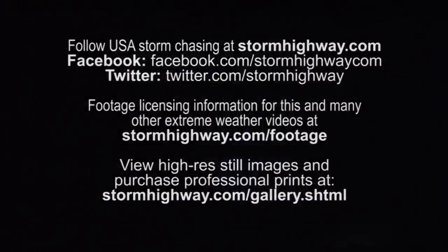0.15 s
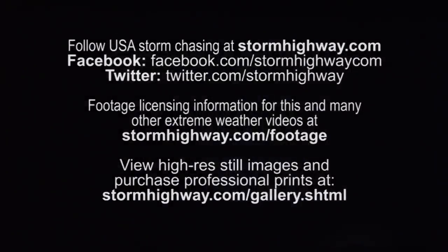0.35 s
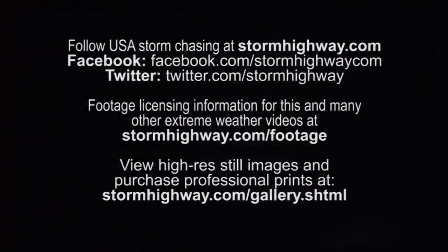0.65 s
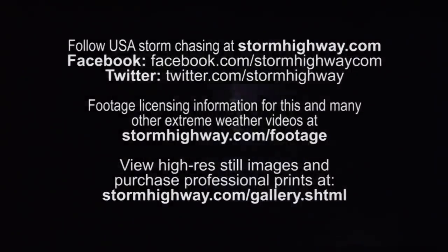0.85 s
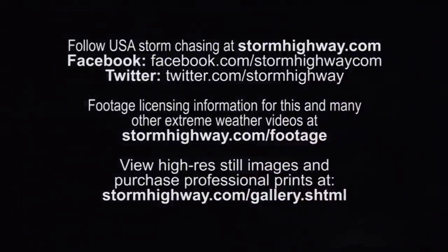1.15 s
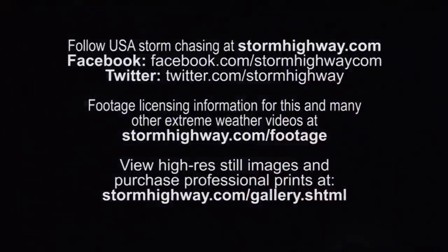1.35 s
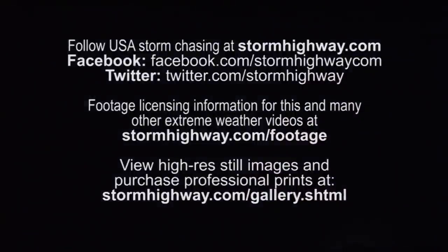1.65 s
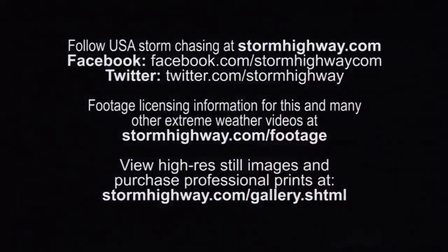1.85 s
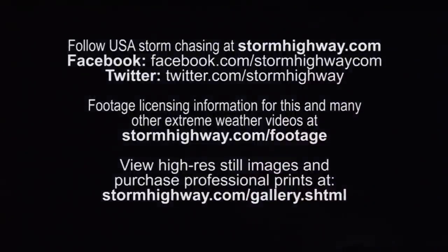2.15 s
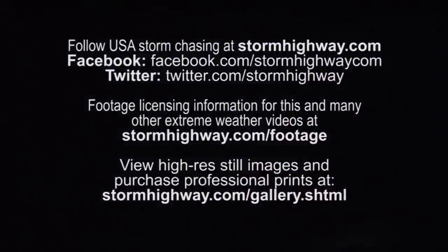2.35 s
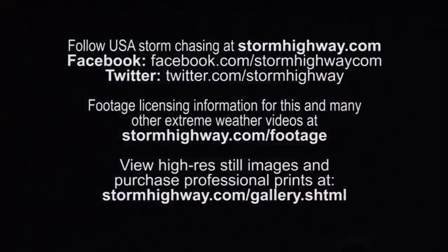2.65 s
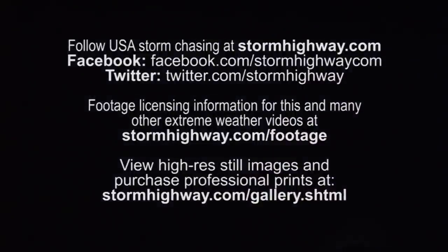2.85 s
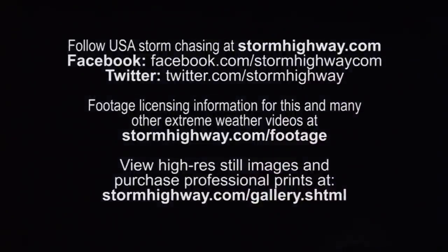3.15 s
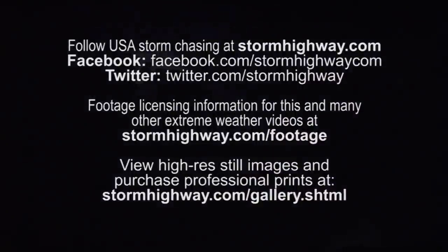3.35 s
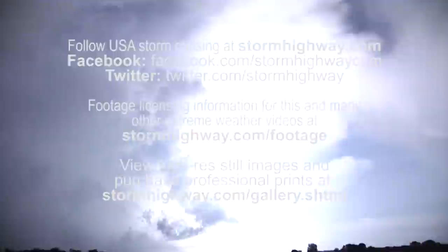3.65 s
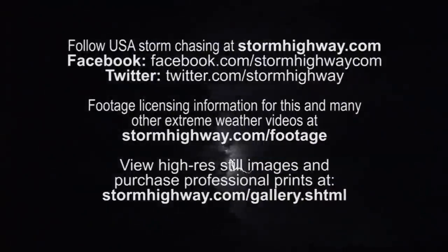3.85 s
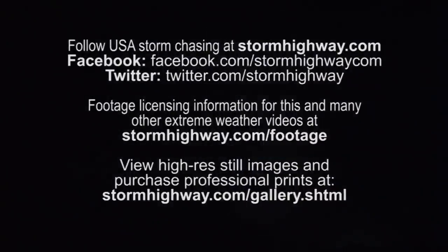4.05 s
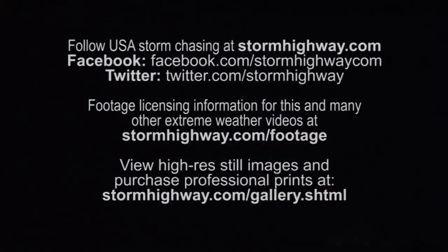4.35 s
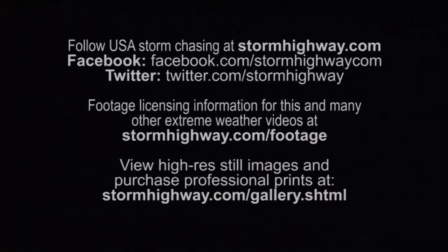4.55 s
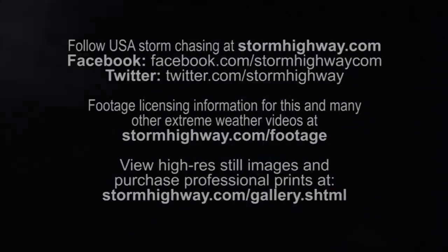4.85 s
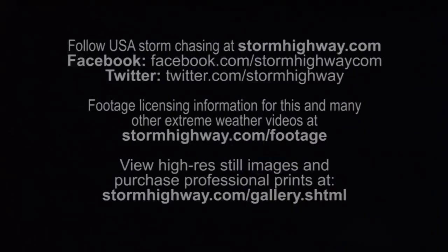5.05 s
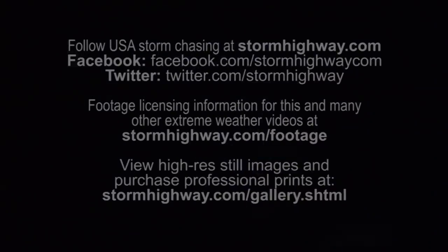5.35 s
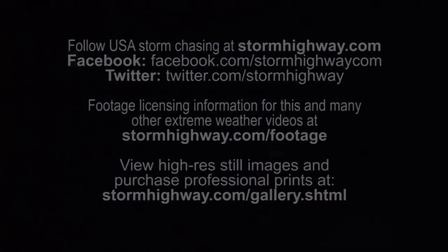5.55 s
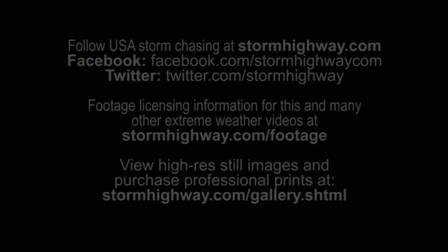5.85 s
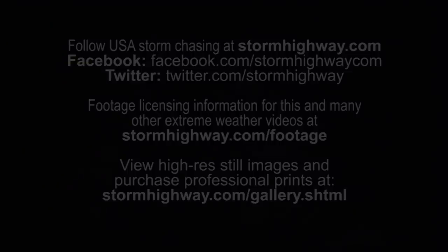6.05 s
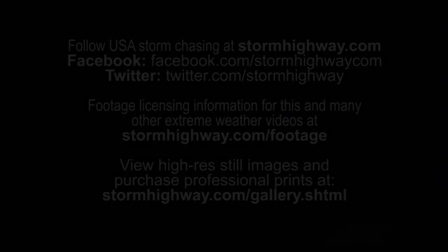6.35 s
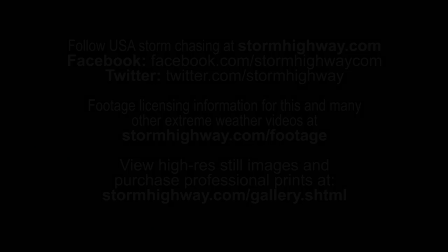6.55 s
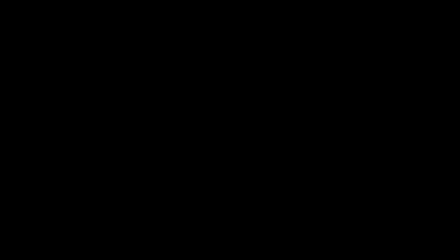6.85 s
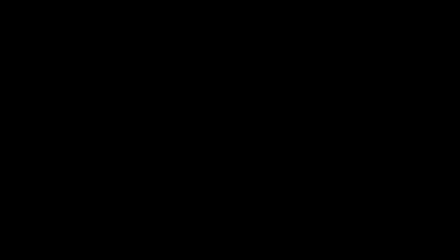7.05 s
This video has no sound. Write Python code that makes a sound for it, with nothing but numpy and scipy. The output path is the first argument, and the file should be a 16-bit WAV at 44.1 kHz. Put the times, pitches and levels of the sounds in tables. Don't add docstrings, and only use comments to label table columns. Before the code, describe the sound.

Stereo night ambience in the open: distant thunder rumbles low and lumpy while many crickets trill all around. A field cricket left of center gives brief bright chirps and a tree cricket pulses about four times a second. As storm and chorus die away, a gritty scrape and one hard plastic click sound right at the microphones. Crickets, faint trill and fizzing katydids remain, then fade out after a soft wind thump.

```python
import sys
import numpy as np
from scipy import signal
from scipy.fft import rfft, irfft, next_fast_len
from scipy.io import wavfile
from scipy.ndimage import uniform_filter1d, map_coordinates

SR = 44100
rng = np.random.default_rng(int(sys.argv[2]) if len(sys.argv) > 2 else 0)


def voltage_ratio(level):
    return 10 ** (np.asarray(level, float) / 20)


def wav_out(sig):
    wavfile.write(sys.argv[1], SR, np.round(np.clip(np.atleast_2d(sig).T, -1, 1) * 32767).astype(np.int16))


N = 317079

STORM_FADE_S = (0, 3.242)


def unit(x):
    return x / np.sqrt(np.mean(x ** 2) + 1e-20)


def along(points, hz):
    f, v = np.transpose(points)
    return np.interp(np.log(hz + 1), np.log(f + 1), v)


def curves(rows):
    s, *columns_db = np.transpose(rows)
    t = np.arange(N) / SR
    return [voltage_ratio(np.interp(t, s, db, left=-150, right=-150)) for db in columns_db]


def fade(span_s):
    return np.interp(np.arange(N) / SR, span_s, [1, 0])


def wobble(rate_hz):
    knots = rng.standard_normal(int(N * rate_hz / SR) + 4)
    return map_coordinates(knots, [np.arange(N) * rate_hz / SR])


def filtered(x, response):
    m = next_fast_len(N + SR // 2)
    return irfft(rfft(x, m) * response(np.fft.rfftfreq(m, 1 / SR)), m)[..., :N]


def rush(gain, alike, patchy_db):
    z = signal.stft(rng.standard_normal((2, N)), nperseg=512)[2]
    patches = uniform_filter1d(rng.standard_normal(z.shape[1:]), size=5, axis=0)
    patches = uniform_filter1d(patches, size=8, axis=1)
    pair = signal.istft(z * voltage_ratio(patchy_db * unit(patches)), nperseg=512)[1][:, :N]

    def mid_side(hz):
        turn = np.arccos(np.clip(along(alike, hz), -1, 1)) / 2
        return gain(hz) * [np.cos(turn), np.sin(turn)]

    mid, side = filtered(pair, mid_side)
    return unit(np.array([mid + side, mid - side]))


def strokes(s, db, hz, pan_db, lead_rad, length_s, fall, bend):
    size = int(np.max(length_s) * SR) + 2
    u = np.clip(np.arange(size) / SR / length_s[:, None], 0, 1)
    pitch_hz = hz[:, None] * (1 + fall * (.5 ** bend - u ** bend))
    phase = 2 * np.pi * (np.cumsum(pitch_hz, axis=1) / SR + rng.random((len(s), 1)))
    swell = voltage_ratio(db[:, None] + 3) * np.sin(np.pi * u ** 1.15) ** 1.2
    first = np.round((s - length_s / 2) * SR).astype(int)
    at = np.clip(first[:, None] + np.arange(size), 0, N)
    ears = []
    for side in (1, -1):
        tone = np.sin(phase + side * lead_rad[:, None] / 2)
        ear = swell * voltage_ratio(side * pan_db[:, None] / 2) * tone
        ears.append(np.bincount(at.ravel(), ear.ravel(), N + 1)[:N])
    return np.array(ears)


def thunder():
    # time in seconds, strength in dB.
    peal_rows = [
        (0, -36.5),
        (.4, -38),
        (.81, -37),
        (1.33, -38),
        (1.43, -33.5),
        (1.5, -38.5),
        (1.96, -35),
        (2.74, -37.5),
        (3.3, -43),
    ]
    # frequency in Hz, level in dB per Hz.
    boom_spectrum = [(8.8, -31), (15, -14), (43, 2), (86, -1), (130, -2), (170, -32.5), (290, -120)]
    roll_spectrum = [(59, -29), (100, -9.5), (152, 2), (274, -6.5), (324, -4), (371, -7.5), (562, -13.5),
                     (767, -22), (1120, -41), (1200, -61), (1560, -72), (2640, -120)]
    roll_gain, = curves(peal_rows)
    boom_lead_s, boom_db, boom_growth = 0.11, -2, 0.61
    boom_gain, = curves([(max(s - boom_lead_s, 0), boom_db - 37 + boom_growth * (db + 37))
                         for s, db in peal_rows])
    peals = voltage_ratio(0.6 * wobble(14) + 0.22 * wobble(45))
    boom = rush(lambda hz: voltage_ratio(along(boom_spectrum, hz)), [(50, .96)], patchy_db=-0.04)
    roll = rush(lambda hz: voltage_ratio(along(roll_spectrum, hz)), [(300, 1.0), (800, 1.0)], patchy_db=1.0)
    return boom_gain * boom + roll_gain * unit(peals * roll)


def chorus():
    crowd_db = [-55.5, -66, -69.5]
    # strokes per second, level in dB, pitch in Hz.
    crowds = [
        [(35.7, 0, 2970), (36.4, -4, 2910), (35.1, -6, 3020), (50.5, -7, 3000), (72.3, -5, 2930),
         (71.5, -8, 3010)],
        [(47.5, 0, 3330), (45.2, -1.5, 3580), (49.1, -2.5, 3460)],
        [(21.5, 0, 4420), (23.6, -1.5, 4800), (19.7, -1.5, 4620), (25.3, -2.5, 4950)],
    ]
    # frequency in Hz, level in dB per Hz.
    haze = [(1200, -33), (1600, -2.5), (2400, -4.5), (3200, 2), (4200, 0.5), (5500, -2), (6500, -24.5)]
    gains = voltage_ratio(crowd_db)
    out = voltage_ratio(-8) * gains[0] * rush(lambda hz: voltage_ratio(along(haze, hz)), [(3000, 0.25)], patchy_db=-2.5)
    falls, pauses_db, spreads = (.055, .08, .09), (.5, 3, 2.5), (.75, .8, 1)
    for gain, crowd, fall, pause_db, spread in zip(gains, crowds, falls, pauses_db, spreads):
        song = 0
        for rate_hz, db, hz in crowd:
            s = np.arange(rng.random() / rate_hz, 3.2, 1 / rate_hz)
            d = rng.standard_normal((len(s), 3))
            effort_db = db + 1.8 * d[:, 1] + pause_db * wobble(7)[(s * SR).astype(int)]
            pan_db = 0 * s + rng.normal(0, 3.2)
            lead_rad = 0 * s + spread * rng.uniform(-1.9, 2.94)
            song = song + strokes(s + .002 * d[:, 0], effort_db, hz + 25 * d[:, 2], pan_db, lead_rad,
                                  .52 / rate_hz + 0 * s, fall, bend=1.9)
        out = out + gain * song / np.std(song[:, :3 * SR])
    return out


def hedges(x):
    # frequency in Hz, 60 dB decay time in seconds.
    decay = [(1000, 0.23), (5000, 0.18), (14000, 0.16)]
    out, step = np.zeros((2, N + SR)), SR // 4
    for start in range(0, N, step):
        hz, t, z = signal.stft(rng.standard_normal((2, step)), SR, nperseg=256)
        dying = voltage_ratio(-60 * t / along(decay, hz)[:, None])
        tail = signal.istft(z * dying, SR, nperseg=256)[1]
        wet = signal.fftconvolve(x[:, start:start + step], tail / np.linalg.norm(tail[0]), axes=1)
        out[:, start:start + wet.shape[1]] += wet
    return out[:, :N]


def night_air():
    # time in seconds, buffet level in dB.
    wind_rows = [
        (0, -64),
        (2.87, -58.5),
        (4.1, -63),
        (4.19, -57.5),
        (5.5, -64.5),
        (5.74, -51),
        (5.8, -53),
        (5.92, -46.5),
        (6.06, -56),
        (7.1, -58.5),
    ]
    # frequency in Hz, level in dB per Hz.
    buffet_spectrum = [(7.1, -37.5), (12, -14.5), (44, 2), (91, -0.5), (107, 0.5), (264, -26.5), (330, -22),
                       (430, -50.5), (730, -120)]
    hum_spectrum = [(120, -26.5), (200, 1), (482, -7), (568, -1.5), (798, -9.5), (898, -3), (1120, -10.5),
                    (1630, -8), (1810, -13.5), (2770, -14), (3300, -7.5), (4290, -40), (7260, -120)]
    insect_spectrum = [(1760, -46.5), (3000, -25), (3380, -20), (3860, -3.5), (3990, -8), (4250, -11.5),
                       (4560, -5.5), (4820, -2.5), (5660, -7), (6030, -2), (6930, -1), (8140, 2),
                       (9690, -9), (13900, -6), (15900, -24)]
    # center in Hz, width in Hz, level over the hum in dB.
    hum_bands = [(890, 87, 4.5), (1225, 170, 6.5), (1628, 26, 6), (2490, 110, 7.5)]
    # frequency in Hz, left-right likeness.
    likeness = [(60, .97), (300, .4), (1400, .6), (3900, .75), (4250, -.7), (4800, -.3), (5500, -.75),
                (6100, -.5), (7100, -.75), (8200, -.5), (9500, -.2), (10500, .4), (15000, .5)]
    ground_swell_s = (1, 2.5)

    def hum_gain(hz):
        bands_db = sum(db * np.exp(-((hz - c) / w) ** 2) for c, w, db in hum_bands)
        return voltage_ratio(along(hum_spectrum, hz) + bands_db)

    hum_level = np.hypot(voltage_ratio(-71), voltage_ratio(-68.5) * fade(STORM_FADE_S))
    hum = hum_level * rush(hum_gain, likeness, patchy_db=1.0)
    hiss = rush(lambda hz: voltage_ratio(along(insect_spectrum, hz)), likeness, patchy_db=1.5)
    insects = voltage_ratio(0.22 * wobble(20)) * hiss
    ground = voltage_ratio(-15) * (1 - fade(ground_swell_s)) * ground_cricket()
    buffet = rush(lambda hz: voltage_ratio(along(buffet_spectrum, hz)), [(60, 1.0), (250, 0.91)], patchy_db=-0.76)
    wind = curves(wind_rows)[0] * unit(voltage_ratio(.4 * wobble(19)) * buffet)
    return voltage_ratio([[3.7], [2.5]]) * hum + voltage_ratio([[4.6], [3.4]]) * voltage_ratio(-65.5) * (insects + ground) + wind


def buzz(rate_hz, jitter_s):
    s = np.cumsum(1 / (rate_hz + .5 * wobble(1.6)[::round(SR / rate_hz)]))
    s, db = np.r_[s, s + .0014], np.repeat([0, -6], len(s))
    d = rng.standard_normal((len(s), 3))
    return unit(strokes(s + jitter_s * d[:, 0], db + 1.6 * d[:, 1], 13300 + 250 * d[:, 2],
                        0 * s + .8, 0 * s + 0.31, 0.0018 + 0 * s, fall=.36, bend=1.3))


def katydids():
    # time in seconds, buzz level in dB.
    buzz_rows = [
        (0, -62),
        (.98, -58.5),
        (3.28, -61.5),
        (3.93, -64),
        (4.59, -61),
        (5.5, -63.5),
        (6.42, -60.5),
        (7.1, -64),
    ]
    # frequency in Hz, level in dB per Hz.
    wing = [(6000, -45), (9800, -22.5), (11000, -13.5), (12300, -14.5), (13200, -7), (13900, 3),
            (14600, -3), (15300, 1), (15750, -10.5)]
    near = buzz(186.2, jitter_s=.00006) + voltage_ratio(-7) * buzz(181.2, jitter_s=.00006)
    shaped = unit(filtered(near, lambda hz: voltage_ratio(.5 * along(wing, hz))))
    blur = rush(lambda hz: voltage_ratio(along(wing, hz)), [(13000, .4)], patchy_db=2.5)
    return curves(buzz_rows)[0] * unit(shaped + blur)


def tree_cricket(chirps, singer, hz):
    gap_s = .021
    s, opening = np.transpose([(first_s + k * gap_s, k == 0)
                               for first_s, many in chirps for k in range(round(many))])
    at_s, effort_db, pan_db = np.transpose(singer)
    d = rng.standard_normal((len(s), 2))
    db = np.interp(s, at_s, effort_db) - 5 * opening + 1.4 * d[:, 0]
    return strokes(s, db, hz - 30 * opening + 22 * d[:, 1], np.interp(s, at_s, pan_db), 0 * s,
                   .015 + 0 * s, fall=.11, bend=1.6)


def tree_crickets():
    # first stroke in seconds, number of strokes.
    staying_chirps = [(.153, 6), (.419, 6), (.695, 6), (.94, 7), (1.187, 6), (1.46, 5), (1.696, 5),
                      (1.946, 4), (2.157, 6), (2.389, 5), (2.622, 6), (2.866, 5), (3.094, 5), (3.341, 4),
                      (3.567, 5), (3.781, 5), (4.002, 5), (4.244, 5), (4.492, 5), (4.706, 5), (4.923, 6),
                      (5.171, 5), (5.466, 5), (5.692, 5), (5.926, 5), (6.159, 5), (6.409, 6), (6.659, 5),
                      (6.883, 6)]
    leaving_chirps = [(.054, 5), (.317, 5), (.541, 5), (.771, 5), (.995, 5), (1.221, 5), (1.469, 5)]
    # time in seconds, effort in dB, left-right in dB.
    staying_singer = [(0, -57, 1), (1.5, -56.5, 12), (1.66, -64.5, 9), (2.8, -60.5, 0), (4.05, -66, -1),
                      (4.3, -63.5, 2), (6, -61.5, 5), (7.1, -64, 0)]
    leaving_singer = [(0, -62.5, 2.2), (.6, -62, 2.4), (.8, -62, 2), (1.25, -57.5, 2), (1.55, -62, 2)]
    staying = tree_cricket(staying_chirps, staying_singer, hz=3479)
    return staying + tree_cricket(leaving_chirps, leaving_singer, hz=3544)


def field_crickets():
    # third stroke in seconds, stretch, opener level in dB.
    near_chirps = [(.623, 1.04, -12), (1.542, 1.0, -15), (2.2, 0.98, -18), (3.003, .98, -17),
                   (3.875, 1.02, -11.5), (4.482, 0.95, -22), (5.223, .99, -18), (6.661, 1.02, -18)]
    # seconds from the third stroke, level in dB, pitch in Hz.
    near_strokes = [(-.07, -47, 4840), (-.0395, -50, 4990), (0, -48, 5005), (.0455, -48.5, 5000)]
    # pitch in Hz, left lead in radians, left-right in dB, stroke gap in seconds.
    far_voices = [(4430, 2.1, -.5, .053), (4830, 2.2, -.5, .052), (4820, 2.5, -.5, .045),
                  (4820, .7, -4, .049)]
    # first stroke in seconds, number of strokes, level in dB.
    far_chirps = [
        [(.16, 1, -47), (.52, 1, -55), (.92, 2, -53), (1.333, 2, -50), (1.706, 2, -54), (2.112, 1, -58)],
        [(.205, 2, -53), (.722, 3, -53), (1.155, 1, -57), (1.258, 2, -53), (1.41, 1, -55), (1.898, 2, -58),
         (2.314, 1, -65), (2.498, 3, -54)],
        [(2.645, 2, -67), (2.863, 2, -64), (3.419, 2, -64), (3.966, 2, -70), (4.194, 1, -64), (4.582, 2, -70),
         (4.99, 3, -63), (5.446, 2, -67), (5.84, 3, -71), (6.431, 2, -70)],
        [(1.826, 1, -63), (3.133, 2, -66.5), (4.759, 2, -65.5), (5.369, 2, -67), (5.64, 1, -72),
         (6.074, 3, -67.5), (6.776, 1, -65)],
    ]
    rows = [(at_s + stretch * later_s, db + opener_db * (k == 0), hz, k == 0)
            for at_s, stretch, opener_db in near_chirps
            for k, (later_s, db, hz) in enumerate(near_strokes)]
    s, db, hz, opening = np.transpose(rows)
    near = strokes(s, db, hz, 4 + 4 * opening, .85 - .8 * opening, .028 - 0.008 * opening, fall=0.1, bend=2.8)
    rows = [(at_s + k * gap_s, db, hz, lead_rad, pan_db)
            for (hz, lead_rad, pan_db, gap_s), chirps in zip(far_voices, far_chirps)
            for at_s, many, db in chirps for k in range(round(many))]
    s, db, hz, lead_rad, pan_db = np.transpose(rows)
    d = rng.standard_normal((len(s), 2))
    far = strokes(s, db + 1.0 + 0.67 * d[:, 0], hz + 40 * d[:, 1], pan_db, lead_rad,
                  0.03 + 0 * s, fall=0.098, bend=2.1)
    return near, far


def ground_cricket():
    s = np.arange(0, N / SR, 1 / 47.0)
    d = rng.standard_normal((len(s), 3))
    return strokes(s + .002 * d[:, 0], 2.5 * d[:, 1], 3850 + 25 * d[:, 2], 0 * s, 0 * s,
                   .013 + 0 * s, fall=.04, bend=1.4)


def switch():
    # start in seconds, peak in dB, scrape length in seconds, brightness in dB, left-right in dB.
    contacts = [
        (3.222, -57.5, 0.093, 10.5, 6.5),
        (3.234, -57, .012, 1, 7.5),
        (3.241, -47.5, 0.02, -2.5, 16.5),
        (3.259, -42, 0.005, -14.5, -1.5),
        (3.283, -52.5, 0.0026, -7, 2),
        (3.287, -42.5, 0.0089, 8, 10),
        (3.307, -30.5, 0.0025, 1.5, 8.5),
        (3.3099, -43.5, .004, 5, 0),
        (3.318, -49, 0.005, -14, -13.5),
    ]
    # center in Hz, width in Hz, level in dB.
    resonances = [(2100, 570, 0.5), (3160, 340, -14), (5620, 150, -8.5), (7760, 480, -21),
                  (11060, 160, -14), (12800, 224, -22), (14000, 140, -21.5)]
    # start in seconds, peak in dB, bottom in Hz, top in Hz.
    bumps = [
        (3.235, -48, 500, 1500),
        (3.246, -39, 395, 1610),
        (3.2495, -47.5, 355, 1400),
        (3.251, -58, 300, 888),
        (3.589, -51.5, 150, 800),
        (3.77, -51.5, 150, 598),
        (3.816, -51.5, 300, 2000),
        (5.4224, -49, 70, 756),
    ]
    out, t = np.zeros((2, N + SR)), np.arange(SR // 10) / SR
    hz = np.fft.rfftfreq(len(t), 1 / SR)

    def mode(center_hz, width_hz, db):
        damping = 1j * hz * width_hz
        return voltage_ratio(db) * damping / (center_hz * center_hz - hz * hz + damping)

    body = mode(*resonances[0]) ** 2 + mode(2600, 1500, -14.5)
    upper = voltage_ratio(-39.0) + sum(mode(c, 2.7 * w, db) for c, w, db in resonances[1:])
    for s, db, length_s, bright_db, pan_db in contacts:
        grit = rng.standard_normal(len(t)) * voltage_ratio(3.5 * rng.standard_normal(len(t) // 21)).repeat(21)
        scrape = rfft(np.sin(np.pi * np.clip(t / length_s, 0, 1) ** 0.33) * grit)
        low, high = irfft(scrape * body, len(t)), irfft(scrape * upper, len(t))
        click = low / np.max(abs(low)) + voltage_ratio(bright_db - 2.5) * high / np.max(abs(high))
        out[:, round(s * SR):][:, :len(t)] += voltage_ratio(db) * voltage_ratio([[pan_db / 2], [-pan_db / 2]]) * click
    for s, db, low_hz, top_hz in bumps:
        puff = voltage_ratio(-60 * t / .012) * (25 * (t == 0) + rng.standard_normal(len(t)))
        band = signal.butter(4, [low_hz, top_hz], "bandpass", fs=SR, output="sos")
        push = signal.sosfilt(band, puff)
        out[:, round(s * SR):][:, :len(t)] += voltage_ratio(db) * push / np.max(abs(push))
    return out[:, :N]


def scene():
    night, storm = fade((4.9, 7.04)), fade(STORM_FADE_S)
    rumble = voltage_ratio([[-.4], [.4]]) * storm * thunder()
    crowd = storm * chorus()
    near, far = field_crickets()
    close = night * (near + tree_crickets())
    far = night * far
    echoes = hedges(voltage_ratio(-18) * close + voltage_ratio(-12) * far + voltage_ratio(-4) * crowd)
    return close + far + crowd + echoes + rumble + night * (katydids() + night_air()) + switch()


def top_cut(x):
    return signal.sosfilt(signal.butter(12, 16470, fs=SR, output="sos"), x)


def record(dry):
    def response(hz):
        delay = np.exp(-2j * np.pi * np.outer([0, .00004], np.minimum(hz, 1500)))
        return (hz < 15780) * delay

    return top_cut(filtered(dry, response))


dry = scene()
out = record(dry)
wav_out(out)
```